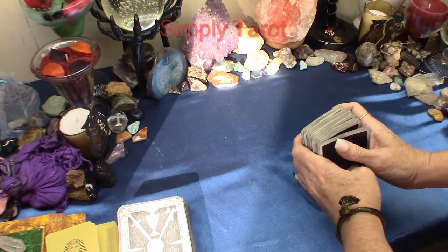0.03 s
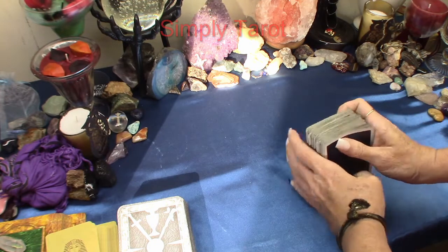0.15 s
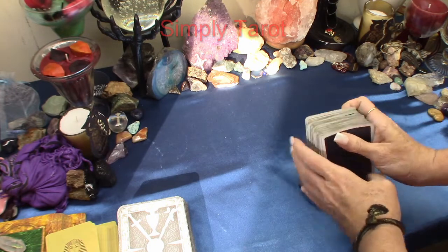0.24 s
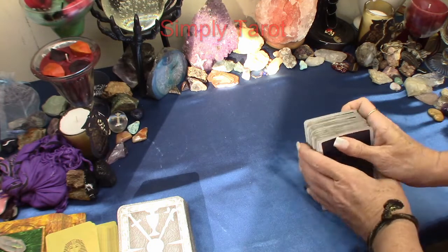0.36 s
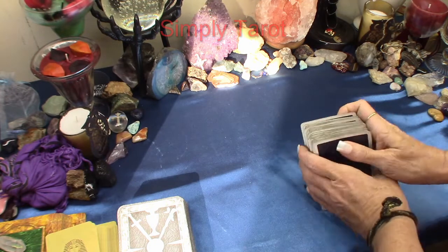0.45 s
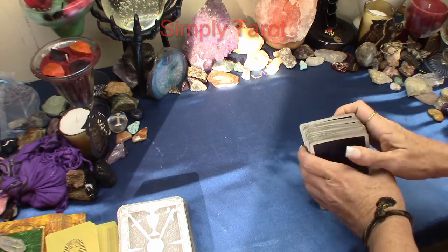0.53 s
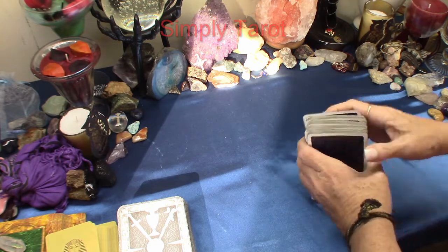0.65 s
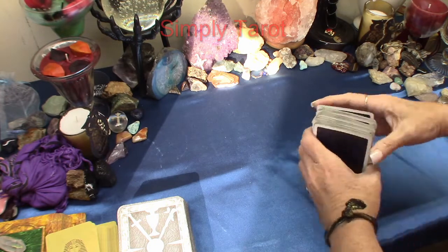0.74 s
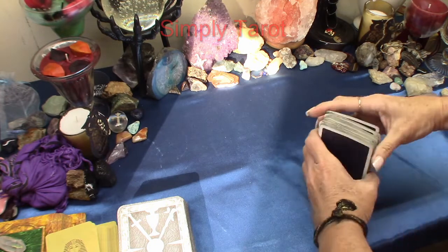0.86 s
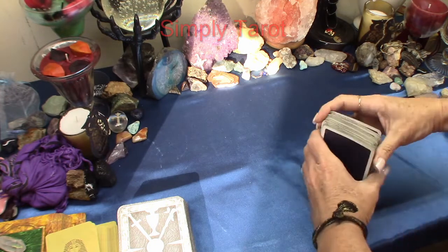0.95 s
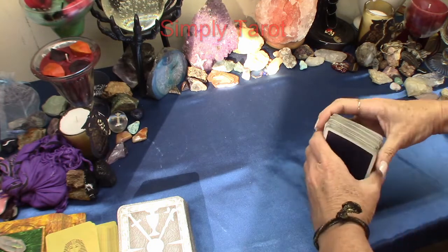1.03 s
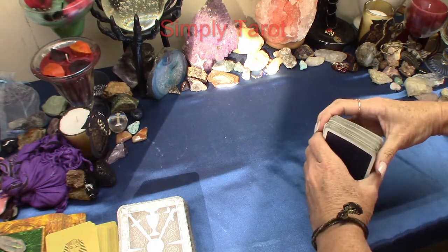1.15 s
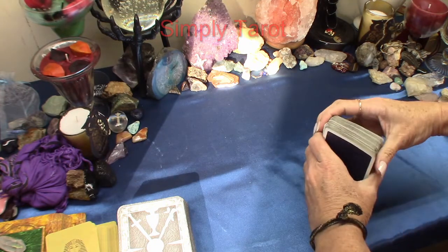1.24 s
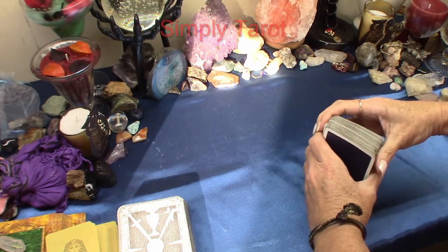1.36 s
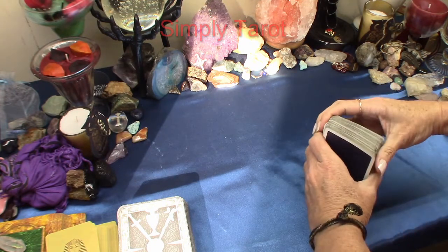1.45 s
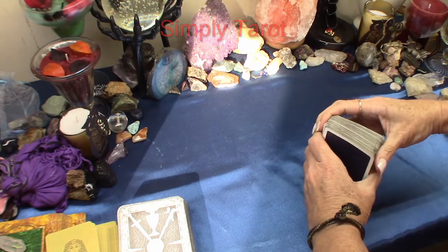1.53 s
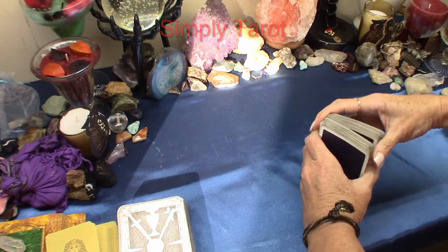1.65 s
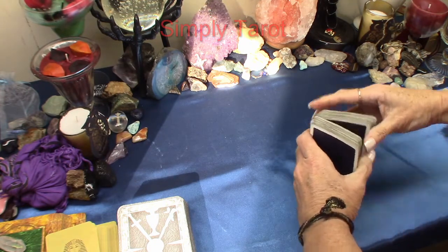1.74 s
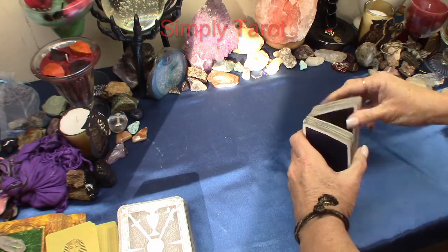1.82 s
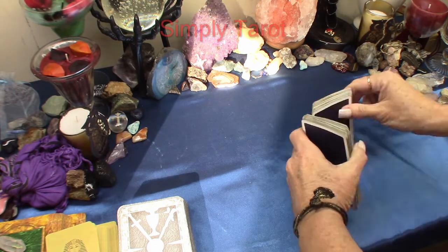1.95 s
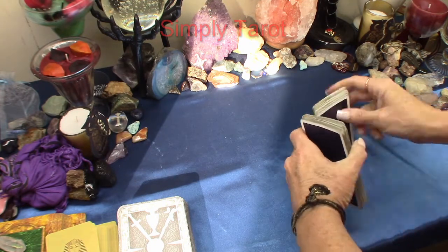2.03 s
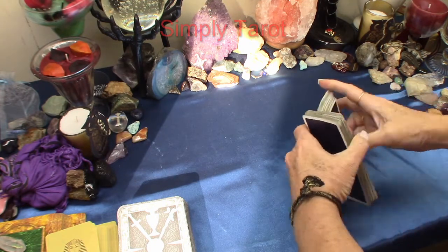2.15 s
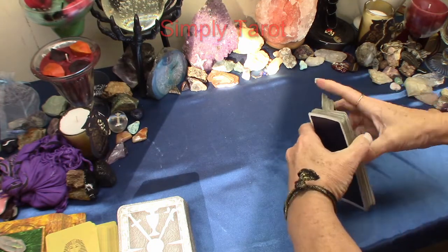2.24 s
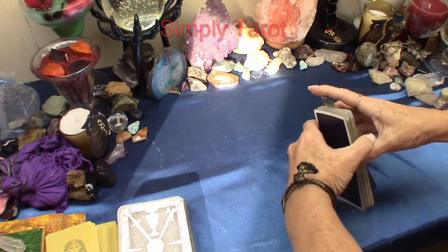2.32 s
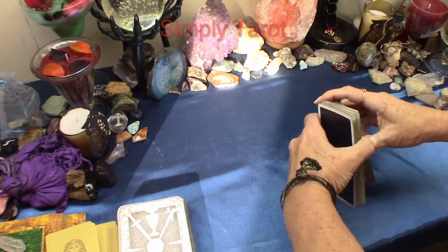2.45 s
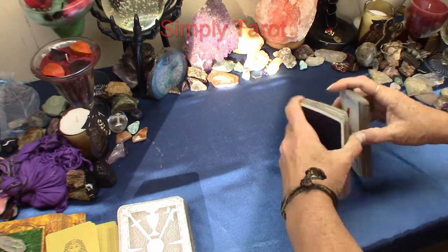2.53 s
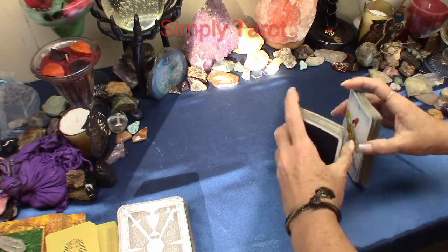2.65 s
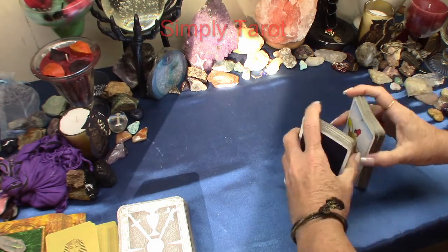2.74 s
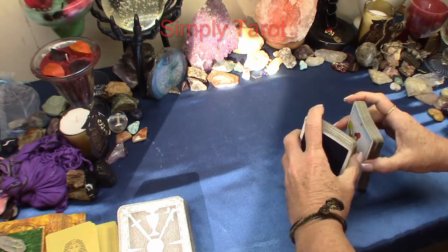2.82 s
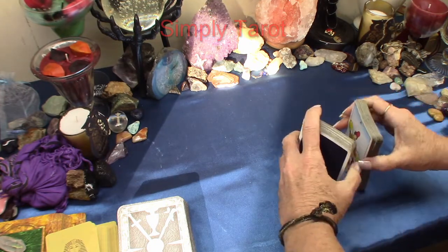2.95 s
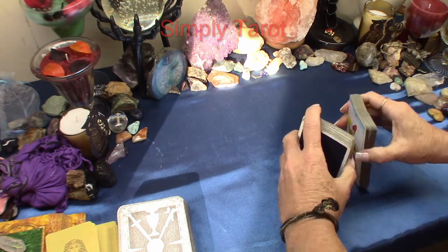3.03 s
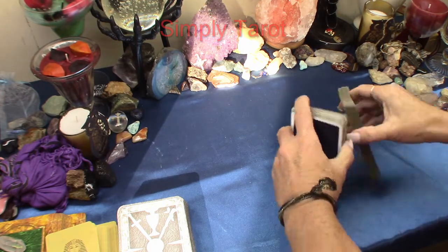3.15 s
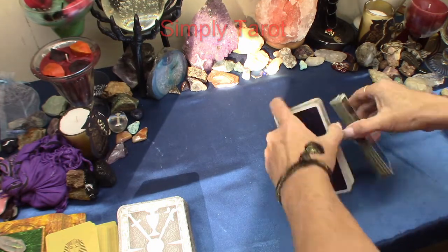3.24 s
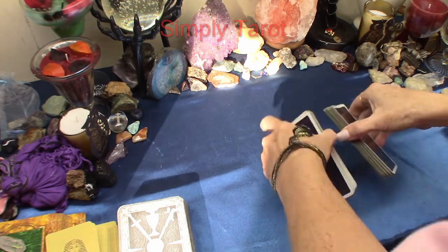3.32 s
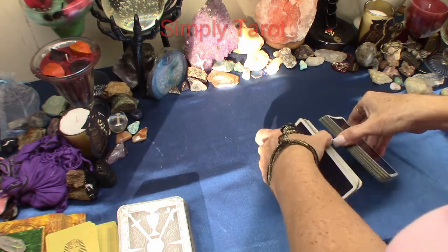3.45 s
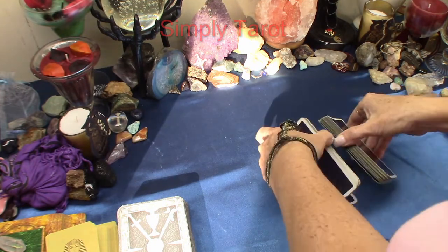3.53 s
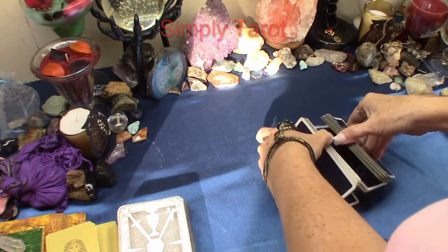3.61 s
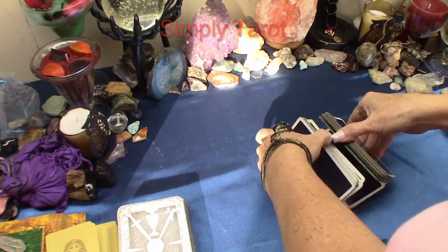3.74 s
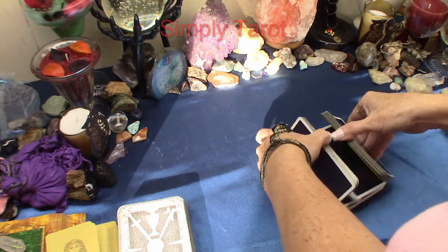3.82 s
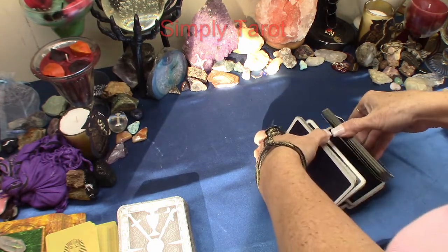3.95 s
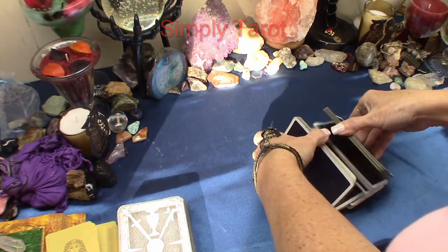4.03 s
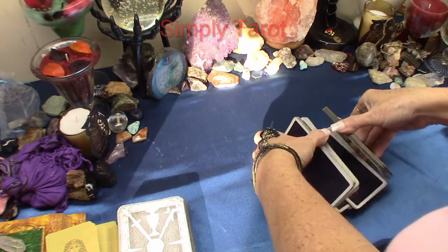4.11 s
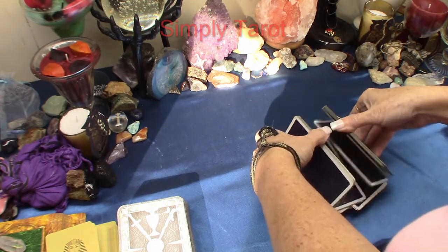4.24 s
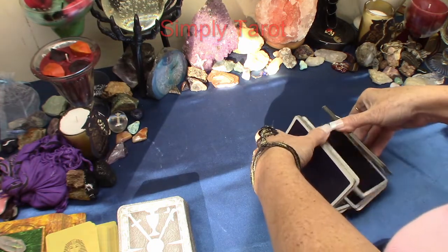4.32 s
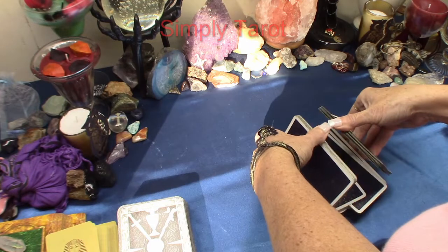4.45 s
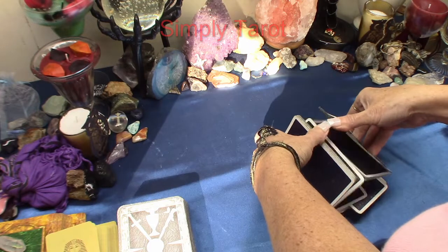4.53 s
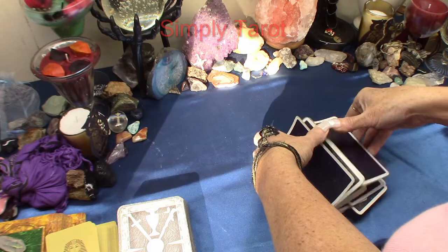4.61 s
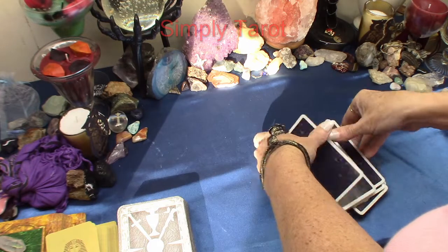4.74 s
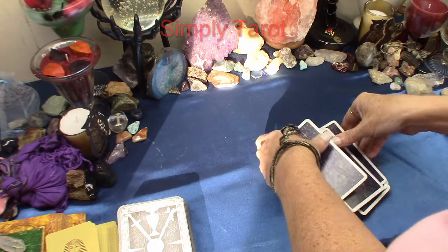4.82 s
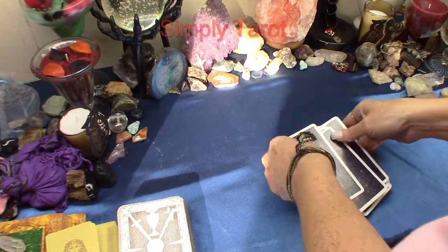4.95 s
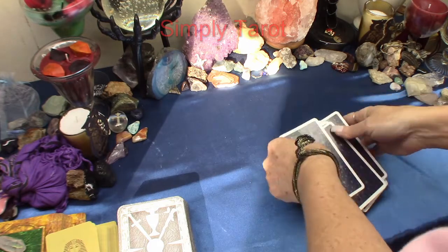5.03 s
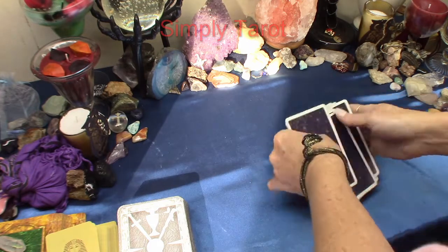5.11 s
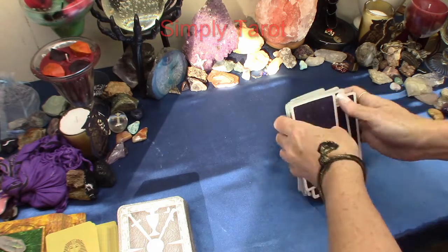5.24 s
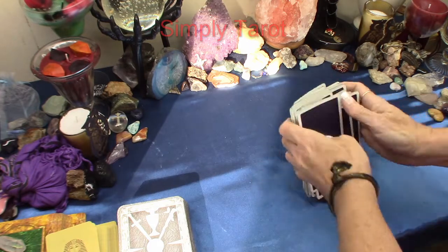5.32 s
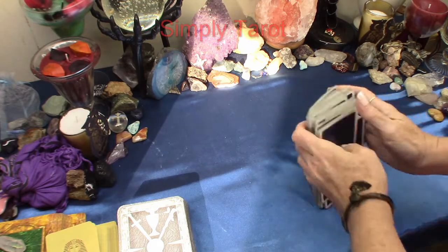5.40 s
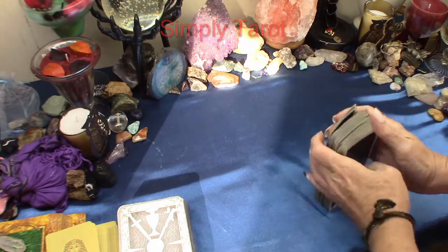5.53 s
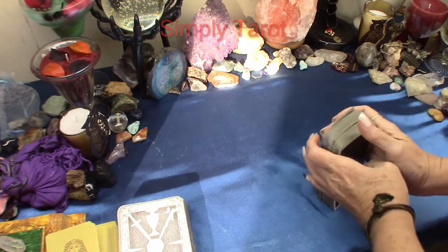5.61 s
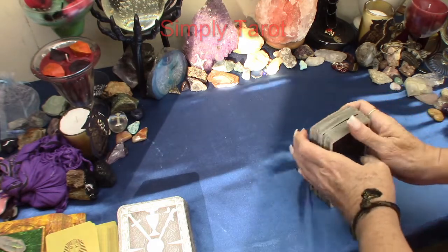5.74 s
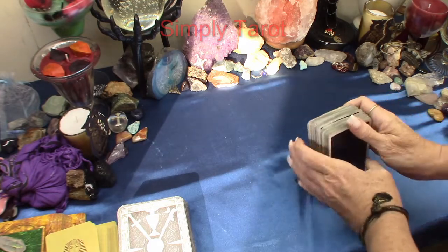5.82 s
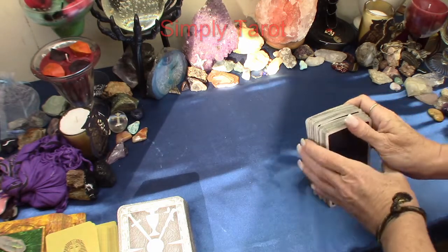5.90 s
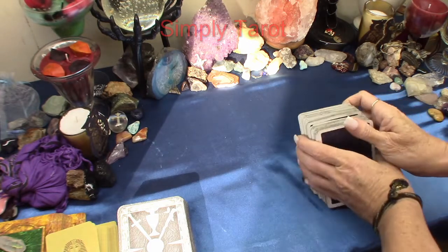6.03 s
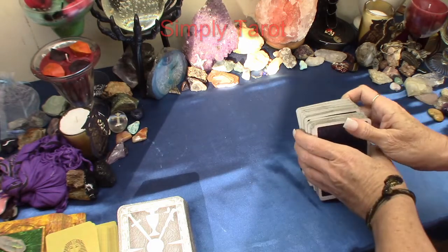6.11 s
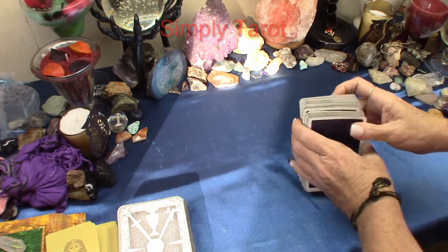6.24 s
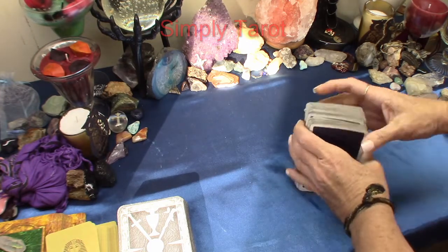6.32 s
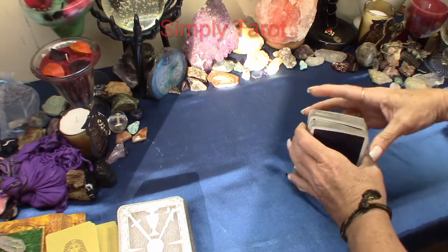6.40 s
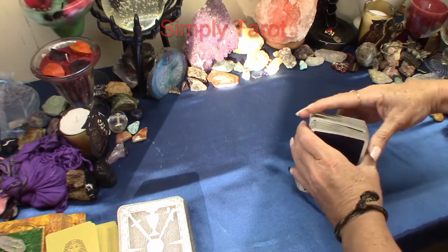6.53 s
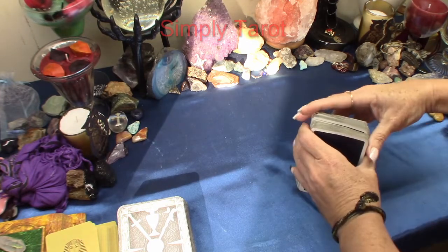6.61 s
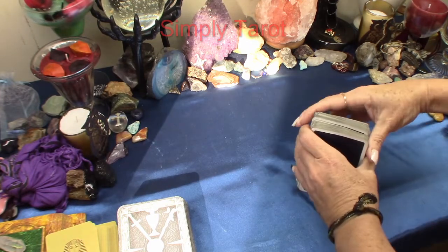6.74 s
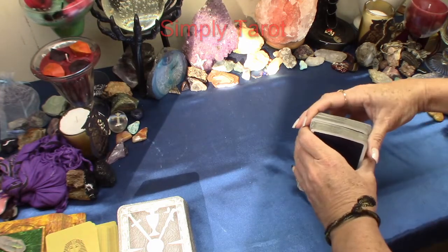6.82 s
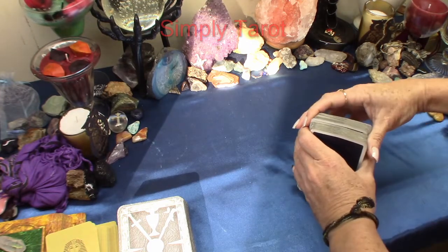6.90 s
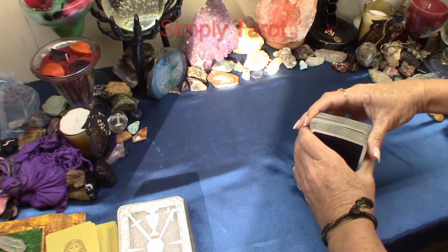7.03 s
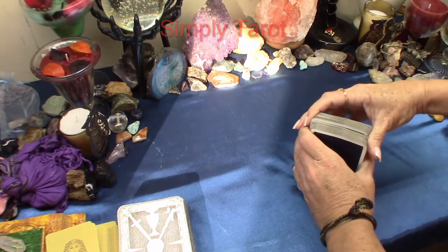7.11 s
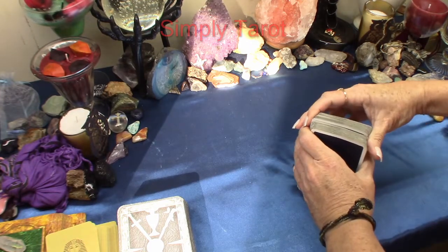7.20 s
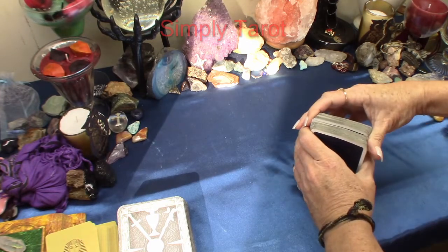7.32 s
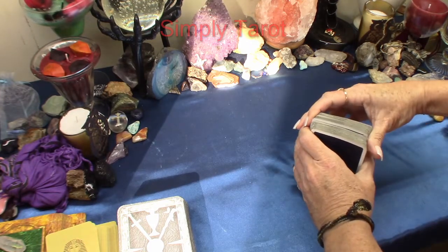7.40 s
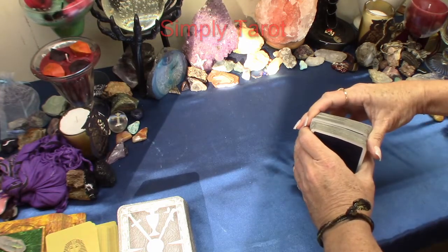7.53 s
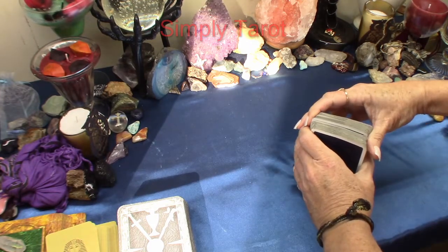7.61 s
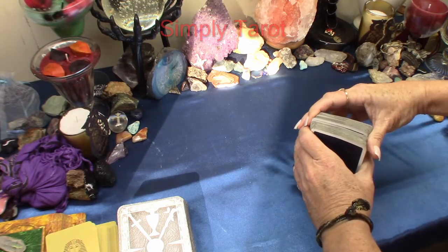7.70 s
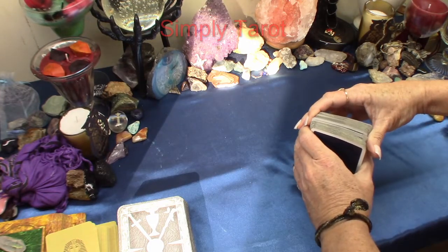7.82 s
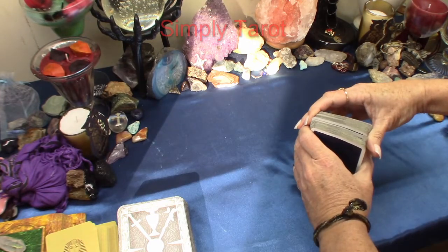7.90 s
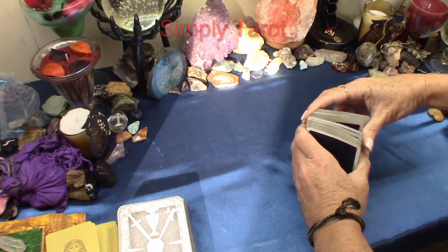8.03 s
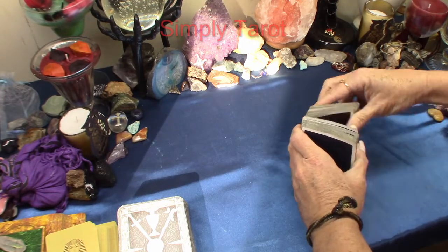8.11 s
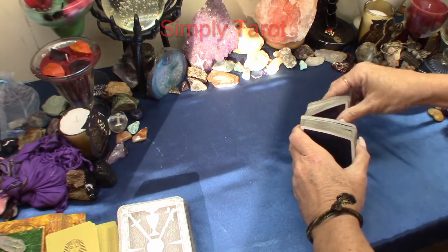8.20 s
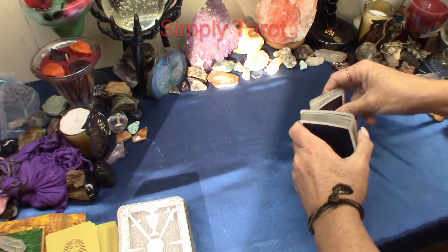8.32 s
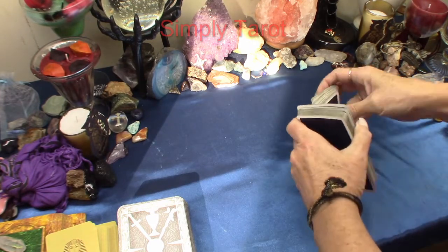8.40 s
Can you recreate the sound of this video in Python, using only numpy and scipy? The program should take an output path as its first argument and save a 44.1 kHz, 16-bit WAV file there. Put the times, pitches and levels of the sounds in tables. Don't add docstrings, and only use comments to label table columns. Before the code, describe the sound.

A stiff card deck is cut, knocked on a cloth-covered table, riffled in crisp snaps, pushed together and slammed square in a small humming room.

```python
import sys
import numpy as np
from scipy import signal
from scipy.fft import rfft, irfft
from scipy.io import wavfile
from scipy.ndimage import uniform_filter1d

SR = 44100
rng = np.random.default_rng(int(sys.argv[2]) if len(sys.argv) > 2 else 0)


def inscribe(sig):
    pcm = np.round(np.clip(np.atleast_2d(sig).T, -1, 1) * 32767)
    wavfile.write(sys.argv[1], SR, pcm.astype(np.int16))


def attenuation_scalar(level_db):
    decades = np.asarray(level_db, float) / 20
    return 10 ** decades


N = 373086


def rms_one(x):
    return x / np.sqrt(np.mean(x ** 2) + 1e-20)


def peak_one(x):
    return x / np.abs(x).max()


def at_hz(points, hz):
    points = np.array(points)
    return np.interp(np.log(hz), np.log(points[:, 0]), points[:, 1])


def resonance(x, hz, width_hz):
    r = np.exp(-np.pi * width_hz / SR)
    edge = (1 - r * r) / 2
    return signal.lfilter([edge, 0, -edge], [1, -2 * r * np.cos(2 * np.pi * hz / SR), r * r], x)


def low_pass(x, cut_hz, order=3):
    return signal.sosfilt(signal.butter(order, np.clip(cut_hz, 100, 18000), fs=SR, output="sos"), x)


def high_pass(x, cut_hz, order=3):
    return signal.sosfilt(signal.butter(order, cut_hz, "high", fs=SR, output="sos"), x)


def swell(t, rise_s):
    return t / rise_s * np.exp(1 - t / rise_s)


def body(x, modes, spread_db):
    draws = spread_db * rng.standard_normal(len(modes))
    total = 0
    for k, (hz, width_hz, db) in enumerate(modes):
        total = total + (-1) ** k * attenuation_scalar(db + draws[k]) * resonance(x, hz, width_hz)
    return peak_one(total)


def add(out, s, x):
    i = round(s * SR)
    out[i:i + len(x)] += x[:N - i]


# (t/s, crack peak level/dB, tick level/dB, bending level/dB, scuff time/ms)
PACKETS = [
    (3.6256, -34, -46, -35, 4.2),
    (3.7561, -35, -59, -37.5, 3.7),
    (3.8962, -27, -64, -40.5, 4.2),
    (4.0901, -39.5, -60, -43.5, 3.9),
    (4.1694, -41, -55, -45.5, 2.9),
    (4.2938, -31.5, -35, -44, 3.3),
]
# (t/s, crack peak level/dB, tick level/dB, bending level/dB, scuff time/ms)
FOLLOWERS = [
    (3.7642, -30.5, -65, -37.5, 6.1),
    (3.9038, -31, -45, -42.5, 2.4),
    (3.9215, -59, -51, -41, 15),
    (3.932, -28, -62, -42, 2.9),
    (4.3672, -32.5, -61, -51, 2.8),
    (4.3734, -43, -65, -48, 4.9),
    (4.428, -50, -56, -49, 2),
    (4.4665, -43, -73, -49.5, 5.5),
    (4.478, -39, -65, -69, 1.5),
    (4.488, -43.5, -61, -56, 4.2),
]
# (t/s, crack peak level/dB, tick level/dB, bending level/dB, scuff time/ms)
SLIPS = [(4.6045, -45, -61, -44, 3.7), (4.6116, -52, -70, -37.5, 6.8), (4.649, -58, -47, -48, 3.6),
         (4.6688, -50, -56, -42, 1.8), (4.683, -40, -52, -45.5, 3.6), (4.7057, -34, -60, -50, 2.6),
         (4.7332, -29, -45, -42, 2.8), (4.7479, -46.5, -37, -37, 4.6), (4.7528, -53, -58, -47, 1.4),
         (4.839, -33.5, -61, -42.5, 3.3), (4.9021, -44, -75, -50, 0.67), (4.9393, -40, -58, -51, 5.9),
         (4.9618, -42, -67, -46.5, 1.8), (4.9752, -43.5, -60, -50.5, 3.9), (5.0723, -47.5, -77, -51.5, 3.6),
         (5.0874, -44, -74, -56, 0.8), (5.152, -52, -76, -59.5, 6.2), (5.1731, -62, -74, -54, 5.5),
         (5.2756, -48, -70, -59, 3)]
# (t/s, crack peak level/dB, bending level/dB, scuff time/ms)
CATCHES = [
    (0.6628, -44.5, -53.5, 4.1),
    (1.8567, -44, -58, 3.3),
    (1.8754, -33, -48, 1.6),
    (1.9032, -54.5, -57, 7.4),
    (1.92, -41, -67, 4.3),
    (2.2543, -41, -52.5, 3.1),
    (8.2447, -32.5, -47, 2.5),
    (5.5784, -49, -43, 4.2),
]
# (t/s, crack peak level/dB)
TICKS = [(0.3957, -46.5), (1.7102, -50), (2.0951, -47.5), (2.5482, -46), (2.7715, -47), (2.809, -40.5),
         (2.963, -54), (3.3094, -52), (3.3532, -48.5), (3.447, -53), (5.0444, -47), (5.4121, -38.5),
         (5.8073, -39), (6.4672, -50)]


def contacts():
    drags = [(s - 0.0048, crack - 8, tick - 26, bend - 8, 6) for s, crack, tick, bend, _ in PACKETS]
    riffle = [(s, crack, tick, bend, bend + 5.5, ms) for s, crack, tick, bend, ms in PACKETS + FOLLOWERS + drags]
    slips = [(s, crack, tick, bend, bend, ms) for s, crack, tick, bend, ms in SLIPS]
    catches = [(s, crack, crack - 19, bend, bend - 5, ms) for s, crack, bend, ms in CATCHES]
    ticks = [(s, crack, crack - 22, crack - 30, crack - 30, 2) for s, crack in TICKS]
    return riffle + slips + catches + ticks


# (f/Hz, width/Hz, level/dB)
CRACK_MODES = [(3000, 2200, 0), (5400, 4000, -1)]
# (f/Hz, width/Hz, level/dB)
BENDING_MODES = [(528, 140, 6), (1140, 1240, 5), (1836, 1700, 3), (2690, 780, -0.5)]


def flicks():
    out, t = np.zeros(N), np.arange(SR // 16) / SR
    for s, crack_db, tick_db, bend_db, flap_db, scuff_ms in contacts():
        scuff_ms = max(scuff_ms, .2)
        scuff = rng.standard_normal(len(t)) * np.exp(-t / (scuff_ms / 1000)) + 1e-18
        scuff[0] = 24.7 / scuff_ms
        tick = peak_one(resonance(high_pass(scuff, 7000), 10000, 8000))
        bend = low_pass(body(scuff, BENDING_MODES, spread_db=2), 4200)
        crack = body(scuff, CRACK_MODES, spread_db=3)
        flap_hz = 370 * attenuation_scalar(rng.normal(0, 0.35))
        flap = swell(t, 0.002) * np.sin(2 * np.pi * flap_hz * t)
        add(out, s, attenuation_scalar(crack_db) * crack + attenuation_scalar(tick_db + 8) * tick)
        add(out, s, attenuation_scalar(bend_db + 10.5) * bend + attenuation_scalar(flap_db - 3) * flap)
    return out


# (t/s, boom peak level/dB, boom f/Hz, rattle level/dB re boom, contact time/ms)
KNOCKS = [
    (0.909, -31.5, 227, -8, 4),
    (0.938, -36.5, 310, -9, 2.8),
    (2.7198, -17.5, 354, -3.5, 7.5),
    (2.77, -23.5, 267, 3, 3.55),
    (2.84, -31.5, 267, -8, 1.4),
    (5.463, -40, 303, -11, 11),
    (5.478, -31.5, 341, 1.5, 5.3),
    (5.506, -29, 327, -12.5, 3.1),
    (5.577, -33, 258, 4.5, 5.6),
    (5.594, -34, 327, 2, 6),
]
SLAM = [
    (6.4125, -25.5, 493, -1.5, 6.8),
    (6.418, -21.5, 243, 6.5, 3.7),
    (6.427, -22.5, 274, 0, 3.6),
    (6.44, -30, 275, -7, 5.4),
]
# (t/s, boom peak level/dB, rattle level/dB re boom)
PATS = [
    (1.922, -51, -1.5),
    (2.25, -54, -10),
    (3.752, -41.5, -7.5),
    (4.298, -47, -2.5),
    (4.749, -37.5, -5),
    (4.872, -44.5, -9),
    (5.117, -54.5, -3),
    (5.773, -52, -0.5),
]
# (f/Hz, level/dB, T60/s)
TABLE_MODES = [(573, -15, 0.3), (646, 28.5, 0.3), (720, 27, 0.3), (784, -16.5, 0.25), (1085, -6, 0.25),
               (1100, -2, 0.25), (1190, 11, 0.25), (1350, 15.5, 0.25), (1437, 9.5, 0.3), (1680, -12, 0.2)]


def knocks():
    out, t = np.zeros(N), np.arange(SR // 2) / SR
    modes = [(hz, 9.6 / min(.5 * t60, .04), 0.5 * db) for hz, db, t60 in TABLE_MODES]
    pats = [(s, boom_db, 349, rattle_db, 5.7) for s, boom_db, rattle_db in PATS]
    for s, boom_db, boom_hz, rattle_db, contact_ms in KNOCKS + SLAM + pats:
        hardness = 0.8 + 0.038 * rattle_db + 0.82 * (SLAM[0][0] <= s)
        contact_s = max(contact_ms, 1) / 1000
        boom = swell(t, 1.22 * contact_s) ** 2 * np.sin(2 * np.pi * boom_hz * t)
        thud_db = -6.5 + 0.91 * min(rattle_db, 0)
        thud = attenuation_scalar(thud_db) * swell(t, 0.0053) * np.sin(2 * np.pi * 168.8 * t)
        thud += attenuation_scalar(-23) * swell(t, 0.044) * np.sin(2 * np.pi * 65 * t)
        hits = low_pass(swell(t, contact_s) * rng.standard_normal(len(t)), 500 * 2 ** hardness)
        hits = low_pass(hits, 2240, order=2) + 1e-18
        rattle = peak_one(high_pass(hits, 300)) + attenuation_scalar(-7) * body(hits, modes, spread_db=2)
        add(out, s, attenuation_scalar(boom_db) * (boom + thud + attenuation_scalar(rattle_db) * rattle))
    return out + board_ring(out)


def board_ring(x):
    t, t60_s = np.arange(SR // 2) / SR, 0.23
    dense = high_pass(rng.standard_normal(len(t)), 503)
    dense = dense + attenuation_scalar(2) * resonance(dense, 590, 290) + attenuation_scalar(1.5) * resonance(dense, 1410, 350)
    dense = dense * attenuation_scalar(-60 * t / t60_s)
    return attenuation_scalar(-8) * signal.fftconvolve(x, dense / np.sqrt(np.sum(dense ** 2)))[:N]


# (f/Hz, correlation)
LIKENESS = [(60, 0.89), (180, 0.79), (550, 0.63), (1650, 0.54), (4970, 0.74), (15000, 0.75)]


def coloured(spectrum):
    hz = np.maximum(np.fft.rfftfreq(N, 1 / SR), 1)
    alike = np.clip(at_hz(LIKENESS, hz), 0, 1)
    shape = attenuation_scalar(at_hz(spectrum, hz)) * (hz > spectrum[0][0])
    mid, side = rfft(rng.standard_normal((2, N))) * shape
    return irfft(np.sqrt(1 + alike) * mid + np.sqrt(1 - alike) * side * [[1], [-1]], N)


# (t of peak/s, rub level/dB, rise/s, fall/s, dull share level/dB)
STROKES = [(0.0, -51, .01, 0.032, 4), (0.114, -73, 0.18, 0.17, -2), (0.239, -59.5, 0.046, 0.014, 9),
           (0.36, -72.5, 0.12, .3, -9), (0.477, -55, 0.028, 0.042, -1), (0.63, -84, .14, 0.029, 7),
           (1.022, -70, 0.57, .015, -28), (1.774, -65, .025, .023, -9), (1.94, -76, .03, 0.062, -8),
           (2.09, -74.5, .15, 0.25, 1.5), (2.255, -71.5, 0.092, 0.011, 12.5), (2.365, -78, 0.092, 0.3, 1),
           (2.558, -69.5, 0.051, .1, -12), (2.722, -69, 0.011, 0.17, -17), (2.966, -70, 0.096, 0.02, 1),
           (6.072, -55, 0.042, 0.056, -3), (6.18, -77, 0.18, 0.44, -6), (6.421, -54, 0.014, 0.015, -13),
           (6.47, -75, 0.31, 0.22, -4), (6.728, -80.5, .3, 0.11, 8.5), (8.07, -72.5, .02, .6, 2),
           (8.269, -71, 0.19, 0.38, -1), (8.455, -81, 0.014, 0.035, -2)]
MESH = [(4.3, -82.5, 0.06, 0.47, 15.5), (4.436, -92, 0.44, .25, 2), (4.61, -66.5, 0.006, 0.24, 15.5),
        (4.77, -68.5, 0.17, 0.049, 10), (5.05, -68, 0.11, 0.054, 3.5), (5.27, -64, 0.16, 0.095, 8),
        (5.486, -60.5, 0.097, 0.077, 0), (5.64, -59, 0.13, 0.035, 4.5), (5.715, -66.5, 0.066, 0.34, -1),
        (5.812, -56.5, 0.047, 0.0093, -2), (5.87, -91, 0.22, 0.31, 1)]
# (f/Hz, level/dB per Hz)
RUB = [(1470, -24.5), (2500, -1), (4930, -3), (6440, -1.5), (7450, -2), (12500, -8.5), (14500, -10),
       (15500, -15)]


def slide():
    t, gain, low = np.arange(N) / SR, np.zeros(N), np.zeros(N)
    for s, rub_db, rise_s, fall_s, dull_db in STROKES + MESH:
        away = np.where(t < s, (s - t) / max(rise_s, .005), (t - s) / max(fall_s, .005))
        stroke = attenuation_scalar(rub_db - 20 * np.minimum(away, 9))
        gain = gain + stroke
        low = low + attenuation_scalar(dull_db) * stroke
    gain, low = uniform_filter1d([gain, low], size=300)
    catch = attenuation_scalar(1.8 * rms_one(low_pass(rng.standard_normal(N), 214)))
    edges = rng.standard_normal(N) * catch
    cloth = resonance(edges, 1250, 1400) + attenuation_scalar(-9) * resonance(edges, 3200, 900)
    hiss = rms_one(coloured(RUB).sum(axis=0))
    return catch / np.sqrt(np.mean(catch ** 2)) * (gain * hiss + low * rms_one(cloth))


def room(x):
    t, t60_s = np.arange(SR // 2) / SR, 0.32
    onset = np.clip(t / 0.00057 - .5, 0, 1)
    tails = rng.standard_normal((2, len(t))) * attenuation_scalar(-60 * t / t60_s) * onset
    fade = np.exp(-t / 0.039)
    responses = fade * tails + (1 - fade) * low_pass(tails, 11000)
    mid, side = [signal.fftconvolve(x, h / np.sqrt(np.sum(h ** 2)))[:N] for h in responses]
    return attenuation_scalar(-6.5) * (mid + attenuation_scalar(-15.5) * high_pass(side, 440) * [[1], [-1]])


# (f/Hz, waver level/dB re tone, rms level/dB)
HUM = [(71, 5, -82), (120, -6, -72.5), (240.8, -14, -62.5), (360, -16.5, -63), (559.7, 35, -80.5),
       (798.5, -5, -77.5), (808.5, 30, -77), (3120, -4, -89)]


def hum():
    t, white = np.arange(N) / SR, rng.standard_normal(N)
    out = np.zeros(N)
    for k, (hz, waver_db, db) in enumerate(HUM):
        skirt = rms_one(resonance(resonance(white, hz, 17), hz, 17))
        out += attenuation_scalar(db) * rms_one(np.sin(2 * np.pi * hz * t + k) + attenuation_scalar(waver_db) * skirt)
    return out


def whine():
    t = np.arange(N) / SR
    turns_per_s, peak_s = 13.2, 6.81
    turn = (1 + np.cos(2 * np.pi * turns_per_s * (t - peak_s))) ** 1.7
    uneven = attenuation_scalar(2.5 * rms_one(resonance(rng.standard_normal(N), 2.6, 3)))
    return attenuation_scalar(-84) * rms_one(turn * uneven * np.sin(2 * np.pi * 5567 * t))


# (f/Hz, level/dB per Hz)
AIR = [(20, -28.5), (85, -25), (118, -10.5), (340, -11.5), (652, -14.5), (1000, -19), (5760, -31),
       (13400, -41)]


def air():
    noise = coloured(AIR)
    return attenuation_scalar(-64) * noise / np.std(high_pass(noise[0], 500, order=2))


def scene():
    mic_low_hz, port_lag_samples = 120, 0.23
    table = high_pass(knocks(), mic_low_hz)
    cards = high_pass(flicks(), mic_low_hz) + slide()
    lead = port_lag_samples * np.gradient(cards) * [[-1], [1]]
    near = table + (cards + lead) * attenuation_scalar(np.array([[-.4], [.4]]))
    return near + room(attenuation_scalar(-2.05) * table + cards) + hum() + whine() + air()


def top_cut(x):
    return signal.sosfilt(signal.butter(12, 15780, fs=SR, output="sos"), x)


def record(dry):
    mix = low_pass(dry, 14000, order=2)
    return top_cut(mix)


dry = scene()
out = record(dry)
inscribe(out)
```